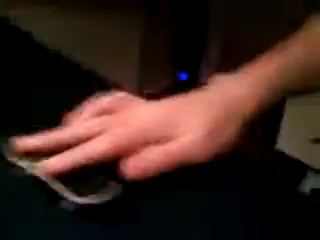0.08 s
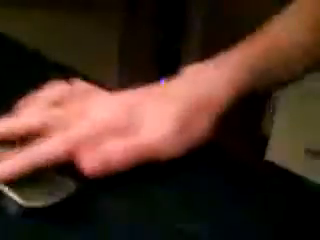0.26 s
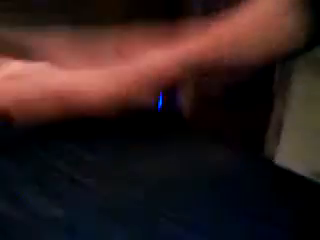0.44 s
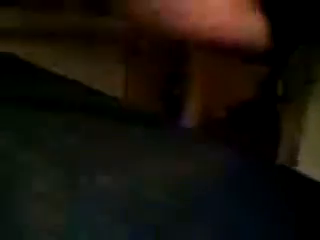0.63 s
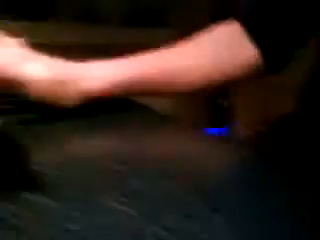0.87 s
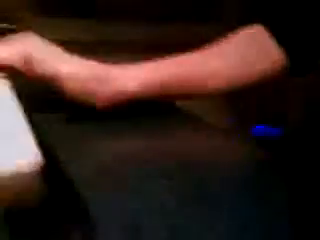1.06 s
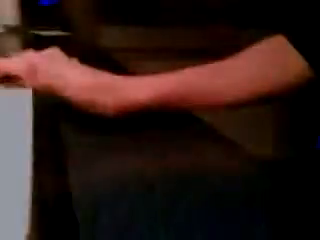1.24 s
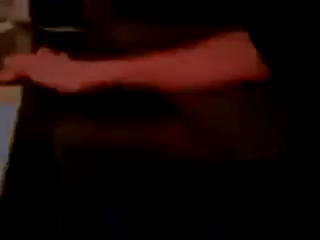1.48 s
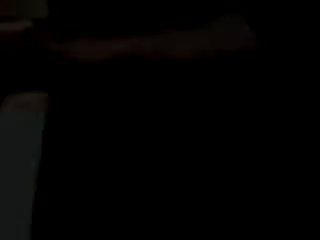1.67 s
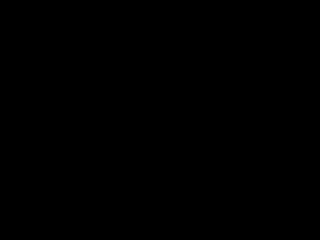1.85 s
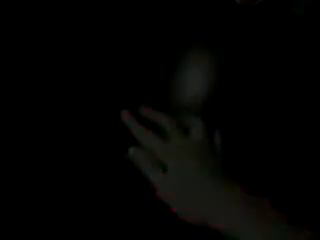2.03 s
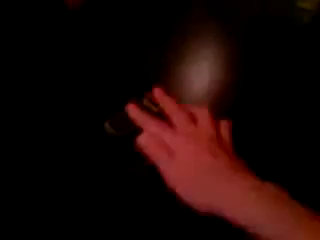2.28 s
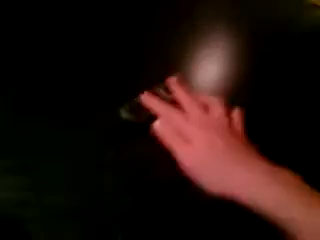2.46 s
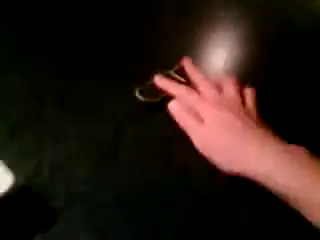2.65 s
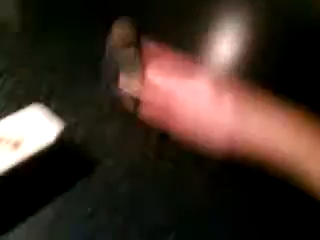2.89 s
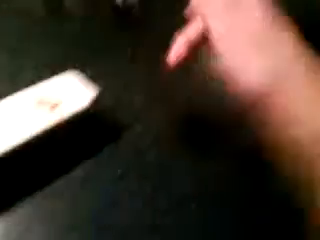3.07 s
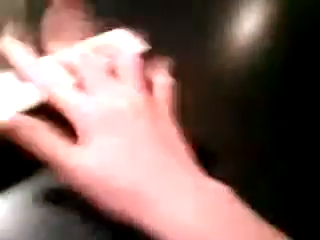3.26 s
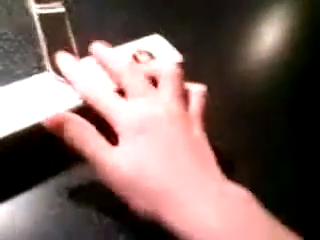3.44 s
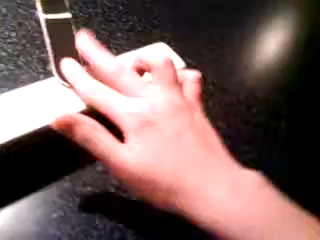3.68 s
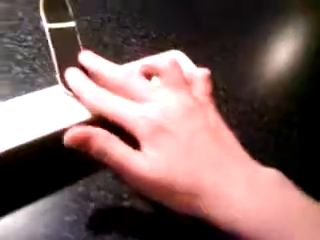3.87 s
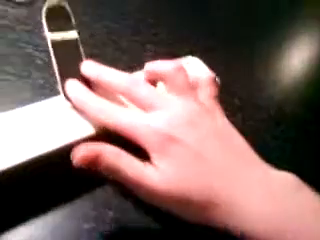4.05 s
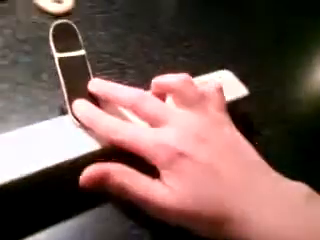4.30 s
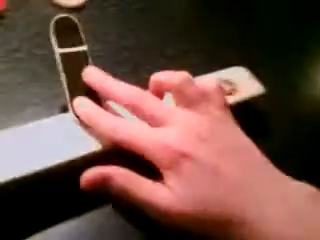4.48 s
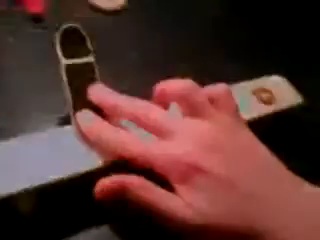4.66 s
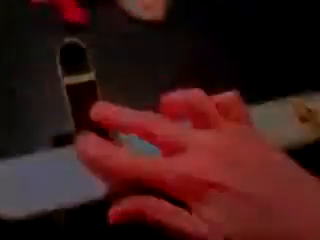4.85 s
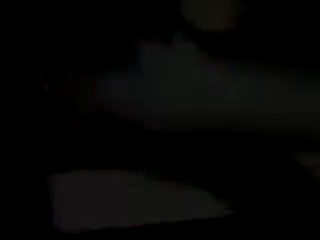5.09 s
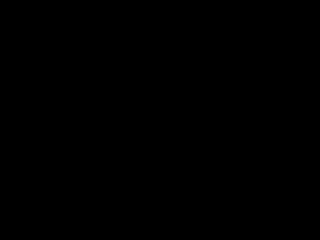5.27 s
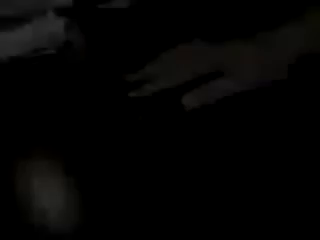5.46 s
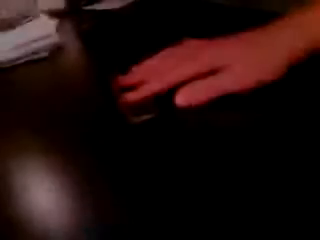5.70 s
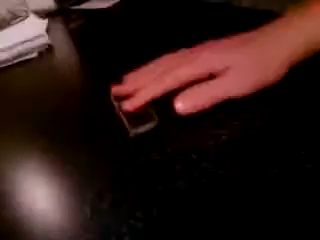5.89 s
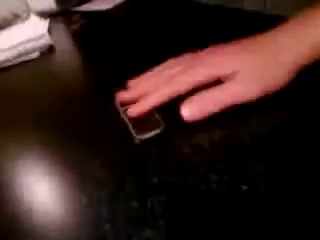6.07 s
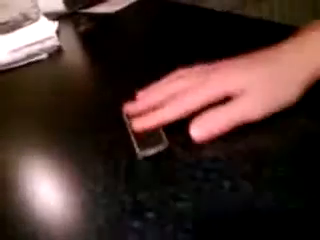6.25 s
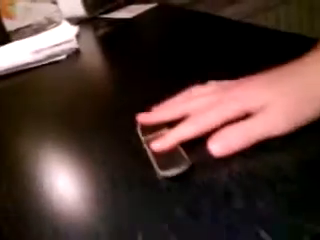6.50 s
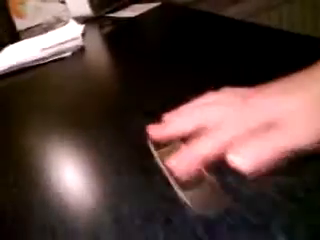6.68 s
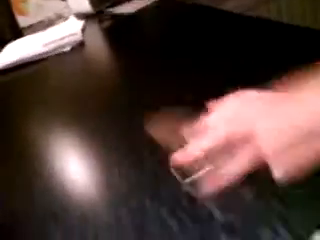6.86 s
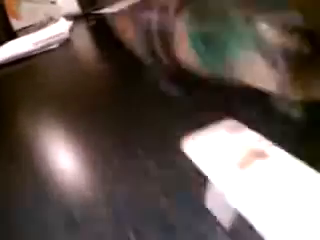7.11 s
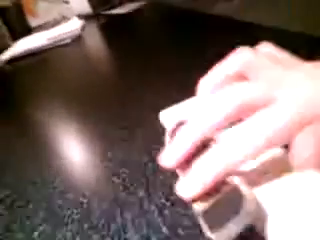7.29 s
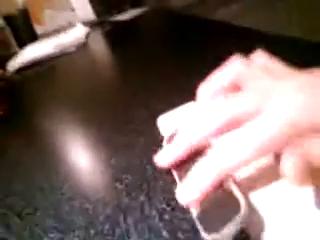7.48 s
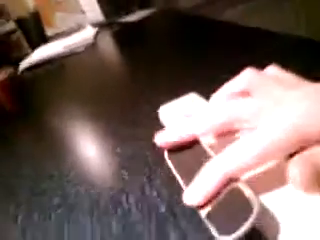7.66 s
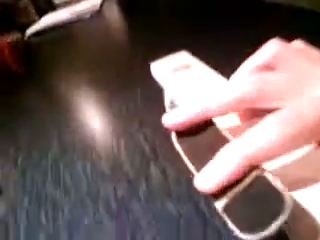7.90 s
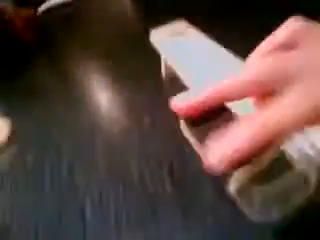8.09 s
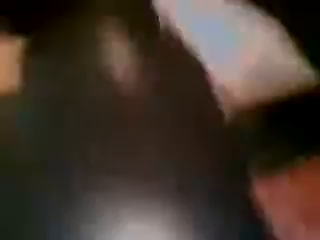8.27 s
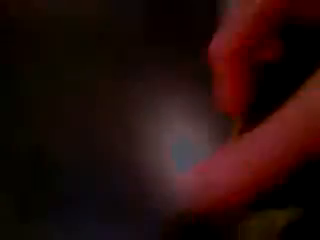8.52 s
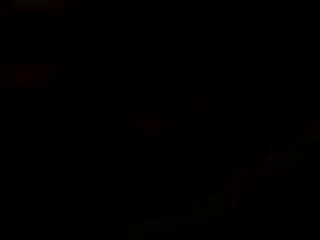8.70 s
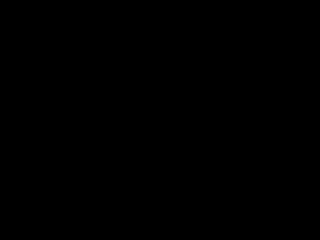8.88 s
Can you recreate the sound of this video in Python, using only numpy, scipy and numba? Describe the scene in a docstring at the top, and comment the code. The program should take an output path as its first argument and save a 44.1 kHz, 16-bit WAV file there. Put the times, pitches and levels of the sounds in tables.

```python
"""Finger-sized skateboard on a table

Four short passages of a tiny board heard close by on a hard table top, made by source-filter synthesis.
Random grit under the wheels excites resonances of deck and axles; blows ring decaying modes; stick-slip
knocks make the deck scrape along a bench. A small room answers with a decaying noise tail, over filtered
hiss, table rumble and faint hum. One short block of sound plays twice and the level dips briefly twice.
"""
import sys
import numpy as np
from scipy import signal
from scipy.fft import rfft, irfft
from scipy.io import wavfile
from scipy.ndimage import uniform_filter1d
from numba import njit

SR = 44100
rng = np.random.default_rng(int(sys.argv[2]) if len(sys.argv) > 2 else 0)


def log_audio(samples):
    """Write samples as a 16-bit WAV file to the path given in sys.argv[1]."""
    # one column per channel
    frames = np.atleast_2d(samples).T
    # limit to full scale, then quantise
    limited = np.clip(frames, -1, 1)
    pcm = np.round(limited * 32767).astype(np.int16)
    wavfile.write(sys.argv[1], SR, pcm)


N = 394254
T = np.arange(N) / SR


def undb(db):
    """Decibels: convert a level to an amplitude ratio."""
    return 10 ** (np.asarray(db) / 20)


def unit(x):
    """Normalisation: scale to rms 1."""
    return x / np.sqrt(np.mean(x ** 2))


def columns(tables):
    """Linear interpolation: control curves of several spans, and a gate that is open inside them."""
    rows = np.vstack(tables)
    gate = np.zeros(N)
    for table in tables:
        start_s, end_s = table[0][0], table[-1][0] + .007
        gate[int(start_s * SR):int(end_s * SR)] = 1
    curves = [np.interp(T, rows[:, 0], column) for column in rows[:, 1:].T]
    return curves + [uniform_filter1d(gate, size=200)]


@njit
def bandpass(x, centre_hz, width_hz):
    """State-variable resonance: a band-pass with a moving centre, gain 1 there."""
    y = np.empty(len(x))
    band, low = 0., 0.  # the two integrator states
    for i in range(len(x)):
        g = np.tan(np.pi * centre_hz[i] / SR)
        damping = width_hz / centre_hz[i]
        v = (band + g * (x[i] - low)) / (1 + g * (g + damping))
        band, low = 2 * v - band, low + 2 * g * v
        y[i] = damping * v
    return y


def ring(x, resonances):
    """Superposition: a sum of fixed resonances with alternating signs, at rms 1."""
    total = np.zeros(N)
    for k, (hz, width_hz, db) in enumerate(resonances):
        total += (-1) ** k * undb(db) * bandpass(x, np.full(N, 1. * hz), 1. * width_hz)
    return unit(total)


def walk(rate):
    """Slow random modulation: levels drawn `rate` times a second and smoothed, spread near 1."""
    hold = int(SR / rate)
    steps = np.repeat(rng.standard_normal(N // hold + 1), hold)
    return np.sqrt(3 / 2) * uniform_filter1d(steps, hold)[:N]


def grit(rate, spread_db, rubbing):
    """Random impulse excitation: tiny knocks of uneven size over a share of smooth rubbing."""
    size = rng.standard_normal(N) * undb(spread_db * rng.exponential(size=N))
    knocks = (rng.random(N) < rate / SR) * size
    return unit(knocks) + rubbing * rng.standard_normal(N)


# Wheels on the table, one curve per roll. Each row: time in seconds, rumble level in dB.
ROLLS = [
    [(0, -27.5), (0.07, -31.5), (0.3, -34), (0.344, -34)],
    [(0.353, -20.5), (0.4, -23.5), (0.43, -21), (0.49, -18), (0.515, -30)],
    [(1.565, -37.5), (1.62, -47.5), (1.73, -38), (1.8, -41), (1.83, -47), (1.9, -51), (2.06, -50.5)],
    [(2.58, -53.5), (2.6, -49), (2.67, -54), (2.76, -62.5), (2.775, -52), (2.81, -54), (2.885, -48)],
    [(2.895, -46.5), (2.915, -26), (2.965, -26.5)],
    [(5.21, -51), (5.28, -57), (5.36, -60), (5.45, -67)],
    [(5.97, -62), (6.02, -47.5), (6.2, -47.5), (6.26, -42.5), (6.45, -40), (6.52, -35), (6.6, -34.5),
     (6.67, -31), (6.8, -28.5)],
    [(6.81, -25), (6.88, -17), (6.92, -23), (6.94, -31)],
    [(8.345, -48.5), (8.365, -35.5), (8.405, -34.5), (8.435, -47.5)],
    [(8.53, -51.5), (8.64, -37), (8.72, -37.5), (8.755, -34), (8.8, -36.5), (8.84, -33), (8.94, -39)],
]
# Colour of each roll at the reference level. Each row: rumble pitch in Hz, then deck ring, axle ring and
# treble grit in dB over the rumble.
ROLL_COLOUR = [(975, -2, -2, 1.5), (990, -3.5, -8.5, -8.5), (1140, -5, -3, -16), (1400, 2, 1, -4),
               (1010, -3, -7.5, -8), (1430, -4.5, -2.5, -11), (920, -7.5, -13, -9), (1080, -5.5, -8.5, -6),
               (1340, 1, -1.5, 0), (1310, -7.5, -7, -14)]
# Resonances of the deck. Each row: centre in Hz, width in Hz, relative level in dB.
DECK_RING = [(470, 40, 1.5), (563, 270, -3), (697, 190, -2.5), (1231, 89, -1), (1470, 30, -2.5),
             (1795, 250, 3.5), (2180, 300, -1)]
# Resonances of the axles. Each row: centre in Hz, width in Hz, relative level in dB.
AXLE_RING = [(3510, 86, -4), (4120, 730, 2), (4556, 500, 1)]
REFERENCE_DB = -35
PITCH_HZ_PER_DB, AXLE_DB_PER_DB, TREBLE_DB_PER_DB = 7.5, 0.1, -0.1035  # harder rolling is higher and duller
DRIFT_DB, DRIFT_PER_S, FLICKER_DB, FLICKER_PER_S = 2, 14, 3.5, 28  # of axle ring, of treble


def wheels():
    """Forced vibration: the table grain shakes deck and axles, and each band's level wanders."""
    rolls = [[row + colour for row in roll] for roll, colour in zip(ROLLS, ROLL_COLOUR)]
    db, hz, deck_db, axle_db, treble_db, gate = columns(rolls)
    effort = db - REFERENCE_DB
    axle_db = axle_db + AXLE_DB_PER_DB * effort + DRIFT_DB * walk(DRIFT_PER_S)
    treble_db = treble_db + TREBLE_DB_PER_DB * effort + FLICKER_DB * walk(FLICKER_PER_S)
    grain, fine = grit(3500, 1.9, .7), grit(3500, 2., .6)
    body_wobble, axle_wobble, treble_wobble = [undb(1.8 * walk(rate)) for rate in (60, 70, 30)]
    rumble = unit(bandpass(grain, hz + PITCH_HZ_PER_DB * effort, 240.0))
    body = (rumble + undb(deck_db) * ring(grain, DECK_RING)) * body_wobble
    axles = undb(axle_db) * ring(grain, AXLE_RING) * axle_wobble
    treble = undb(treble_db) * ring(fine, [(6530, 1400, -4.0), (3120, 970, -8)]) * treble_wobble
    return gate * undb(db) * (body + axles + treble)


# Blows of the board. Each row: start in seconds, dry peak in dB, colour below 1 kHz, near 2 kHz and near
# 6 kHz in dB over that near 4 kHz, time scale of the noise burst in ms.
HITS = [(0.518, -7.5, -18, -5, 4, 3.6), (0.778, -19, -24, -26, -1, 0.83), (0.951, -15.5, -40, 16, 21, 10.6),
        (0.959, -4, -43, -8, -10, 3), (0.964, -1.5, -38, -16.5, -14, 3.4), (0.999, -9, -34, -7, -6.5, 15),
        (1.035, -10.5, -25, 2.5, -3, 8.9), (1.262, -22, -18, 6, -8, 2.8), (1.376, -27, -1.5, 6, 6.5, 4.6),
        (1.418, -26.5, -17.5, -8, -8, 4.9), (1.494, -14.5, -27, -1.5, 1.5, 0.79),
        (1.526, -10.5, -19.5, -5, 1, 2.1), (1.535, -10.5, -9.5, 10.5, -2.5, 7),
        (2.767, -32.5, -15, 2, 1, 7.4), (2.973, 1.5, -13, -15.5, -0.5, 0.81),
        (2.999, -16.5, 3.5, -17, 5, 4.3), (3.244, -26, -14.5, -5, -5, 6), (3.253, -4, -10, -13.5, -3, 1.5),
        (3.28, -7, -37, -5.5, -5, 6.1), (3.293, -5, -22, 1, -2, 2.9), (3.325, -7, -26, -1, 2.5, 1.5),
        (3.376, -13, -17, 12, 2, 5.8), (3.5, -20, -29, -2, 10, 1.6), (3.546, -21.5, -32, -15, 8, 3.2),
        (5.176, -20, -16.5, -26, -7.5, 3), (5.191, -21, -18, -6, -2, 2.8), (6.942, -6.5, -26, -2.5, 2, 1.7),
        (6.96, -5.5, -10, -13, 5, 5.2), (7.271, -5.5, -7, 7.5, 14.5, 2.56), (7.299, -11, -11, 5.5, 0, 2.2),
        (7.305, -6, -18.5, 3.5, -2, 5.6), (7.602, -29.5, -38.5, 0.5, 3, 1.8),
        (8.25, -21, -22.5, -8, -8, 0.68), (8.441, -14.5, -23, -1, 11, 3.5),
        (8.454, -8.5, -23, -14.5, -4, 5.3), (8.461, -11.5, -12, -8, -0.5, 3.9)]
# Modes of deck, axles and bench. Each row: mean frequency in Hz, mean relative level in dB, t60 in seconds.
BOARD_MODES = [(445.4, 0, 0.049), (910, -6.5, 0.11), (1395, -3, 0.05), (1670, -9, 0.03), (1980, -2, 0.019),
               (2376, -0.5, 0.024), (2813, -11.5, 0.03), (3440, -4, 0.019), (4164, -2.5, 0.021),
               (5800, -5.5, 0.0031)]


def hits():
    """Modal excitation: a short noise burst cracks and rings every mode; where a blow falls sets the colour."""
    early = 96  # samples kept ahead of the blow for the colour filter's pre-ringing
    out, t = np.zeros(N + 8192), np.arange(4096) / SR
    hz, db, t60 = np.transpose(BOARD_MODES)
    f = np.arange(2049) * SR / 4096 + 1  # offset keeps the logarithm finite
    corners_hz = [150, 600, 1800, 3800, 6300, 8000]
    for s, peak_db, low_db, mid_db, top_db, ms in HITS:
        # every blow scatters mode levels by 3 dB and frequencies by 1.2 %
        level_chance, pitch_chance = rng.standard_normal((2, len(BOARD_MODES))) * [[3], [.012]]
        decay = np.exp(-np.log(1000) * np.outer(t, 1 / t60))
        modes = np.sin(2 * np.pi * np.outer(t, hz * (1 + pitch_chance))) * decay
        body = modes @ undb(db + level_chance - 31)
        body[0] = 1  # passes the bare crack of the burst
        # each blow is a noise burst with a short soft rise, then a weaker decaying tail
        rise = t * 1000 / max(ms, .1)
        envelope = rise * np.exp(-2.4 * rise) + undb(-24) * np.exp(-t / .014)
        burst = rng.standard_normal(len(t)) * envelope
        corners_db = [low_db - 31.0, low_db, mid_db, 0, top_db, top_db - 17]
        colour_db = np.interp(np.log(f), np.log(corners_hz), corners_db)
        blow = np.roll(irfft(rfft(body) * rfft(burst) * undb(colour_db)), early)
        first = int(s * SR)
        out[first:first + len(blow)] += undb(peak_db) * blow / np.abs(blow).max()
    return out[early:N + early]


def stick_slip(tables, resonances, chatter_db, rate):
    """Stick-slip friction: knocks that come in quick bunches excite resonances."""
    db, gate = columns(tables)
    slip = grit(3000, 2.1, .7) * undb(chatter_db * walk(rate))
    return gate * undb(db) * ring(slip, resonances)


# Deck scraping on the bench, one curve per grind. Each row: time in seconds, level in dB.
GRINDS = [
    [(1.05, -32), (1.15, -40), (1.25, -47), (1.37, -45), (1.4, -36.5), (1.46, -37.5), (1.49, -54)],
    [(3.26, -26), (3.33, -25.5), (3.4, -33.5), (3.55, -38), (3.63, -40.5), (3.7, -58), (3.78, -51),
     (3.82, -47.5), (3.95, -53.5)],
    [(5.14, -51), (5.2, -48)],
]
# Resonances of the grinds. Each row: centre in Hz, width in Hz, relative level in dB.
GRIND_RING = [(1650, 254, 0.5), (2410, 240, 0), (3040, 690, -3), (4050, 720, 1.5), (6100, 6700, -8)]


def grinds():
    """Stick-slip friction: the deck grinds on the bench."""
    return stick_slip(GRINDS, GRIND_RING, 2.2, 70)


# The long slide of the deck on the bench. Each row: time in seconds, level in dB.
SLIDE = [
    [(7.69, -48.5), (7.79, -38), (8.05, -37), (8.3, -39), (8.345, -40)],
]
# Resonances of the slide. Each row: centre in Hz, width in Hz, relative level in dB.
SLIDE_RING = [(1780, 2000, 7.1), (3080, 110, 21.2), (4100, 170, 4.6), (5800, 230, 2), (5300, 6700, 6.3)]


def slide():
    """Stick-slip friction: the deck slides with a narrow, dominant resonance near 3 kHz."""
    return stick_slip(SLIDE, SLIDE_RING, 2.2, 70)


# The bench knocking against the table while the deck slides. Each row: time in seconds, level in dB.
BENCH = [
    [(7.74, -55), (7.8, -48), (8.3, -49), (8.39, -45), (8.45, -56)],
]
# Resonances of the bench. Each row: centre in Hz, width in Hz, relative level in dB.
BENCH_RING = [(132, 28, -0.5), (348, 36, -4.5)]


def bench_knocks():
    """Low-frequency resonance: bunched knocks of the bench on the table, slower and more uneven."""
    return stick_slip(BENCH, BENCH_RING, 4, 22)


ROOM_T60_S, ROOM_DB = 0.32, -10.5


def room(x):
    """Reverberation: convolution with dense, exponentially decaying echoes that build up over 10 ms."""
    t = np.arange(int(.6 * SR)) / SR
    decay = np.exp(-np.log(1000) * t / ROOM_T60_S)
    tail = rng.standard_normal(len(t)) * decay * np.minimum(t / .01, 1)
    tail /= np.sqrt(np.sum(tail ** 2))  # unit energy
    return undb(ROOM_DB) * signal.fftconvolve(x, tail)[:N]


# Edges of the four passages. Each entry: time in seconds.
CUTS_S = [0, 2.062, 5.453, 8.56, 9]
# Background of each passage. Each row: fade-in start in seconds, its length in seconds, time at which the
# fade-out line reaches zero in seconds, hiss in dB at start and at end, idle table in dB.
PASSAGES = [(-1, 1.3, 2.44, -51.5, -48.5, -66), (2, 1.53, 5.65, -49, -55, -61),
            (5.5, 0.8, 10, -53.5, -51, -60.5), (5.44, .9, 11, -49.5, -57, -76)]
FADE_OUT_S = 1.0


def passages():
    """Piecewise envelopes: fade gain, hiss gain and idle table gain, passage by passage."""
    fade, hiss, idle = np.zeros((3, N))
    for start, end, row in zip(CUTS_S, CUTS_S[1:], PASSAGES):
        fade_in, rise_s, silent, first_db, last_db, idle_db = row
        now = (T >= start) & (T < end)
        rise = (T[now] - fade_in) / rise_s
        fall = (silent - T[now]) / FADE_OUT_S
        fade[now] = np.clip(np.minimum(rise, fall), .03, 1)
        hiss[now] = undb(np.interp(T[now], [start, end], [first_db, last_db]))
        idle[now] = undb(idle_db)
    return fade, hiss, idle


# Hand or board pressing on the table top. Each row: start in seconds, end in seconds, dB at start, dB at end.
PRESSES = [(0, 0.546, -43.5, -51.5), (0.817, 1.074, -37.5, -54), (1.09, 1.562, -55.5, -53.5),
           (2.608, 2.99, -50.5, -55.5), (3.238, 4.901, -50.5, -62.5), (6.1, 6.977, -50.5, -55),
           (7.6, 8.5, -56.5, -56)]
# Resonances of the table. Each row: centre in Hz, width in Hz, relative level in dB.
TABLE_RING = [(91, 20, 1), (157, 22, 0.5), (193, 27, -1), (327, 130, -2.5)]


def table_rumble(idle):
    """Plate resonance: noise shakes the table, more while something presses on it."""
    spans = [[(start, first_db), (end, last_db)] for start, end, first_db, last_db in PRESSES]
    press_db, gate = columns(spans)
    shake = np.maximum(uniform_filter1d(gate, size=2000) * undb(press_db), idle)
    return ring(rng.standard_normal(N), TABLE_RING) * shake * undb(0.97 * walk(35))


# Spectrum of the hiss. Each row: frequency in Hz, relative density in dB per Hz.
HISS_COLOUR = [(30, 9.5), (150, -31.5), (350, -2.5), (800, -1.5), (1200, -1.5), (3300, -4), (7500, -12.5)]


def hiss(gain):
    """Coloured noise: random noise shaped in the frequency domain, its level drifting slightly."""
    hz, db = np.transpose(HISS_COLOUR)
    f = np.arange(N // 2 + 1) * SR / N + 1
    shape = undb(np.interp(np.log(f), np.log(hz), db)) * (f < 1.1 * TOP_HZ)
    noise = unit(irfft(rfft(rng.standard_normal(N)) * shape, N))
    return noise * gain * undb(.8 * walk(12))


# Partials of the hum. Each row: frequency in Hz, level before its fade in dB rms.
HUM = [(100, -65), (199.5, -55)]
# Fade of the hum. Each row: time in seconds, gain in dB.
HUM_FADE = [(.85, -2.5), (1.1, -6.5), (1.9, -32)]


def hum():
    """Steady sine tones: mains hum that sinks over the first two seconds."""
    tones = sum(undb(db) * np.sqrt(2) * np.sin(2 * np.pi * hz * T) for hz, db in HUM)
    return tones * undb(np.interp(T, *np.transpose(HUM_FADE)))


def background():
    """Superposition: hiss and table rumble under the fades, with the hum outside them."""
    fade, hiss_gain, idle = passages()
    return fade * (hiss(hiss_gain) + table_rumble(idle)) + hum()


def scene():
    """Superposition: board sounds in the room, echoes cut where a passage ends, over the background."""
    board = wheels() + hits() + grinds() + slide() + bench_knocks()
    total = background()
    for start, end in zip(CUTS_S, CUTS_S[1:]):
        passage = (T >= start) & (T < end)
        total += passage * (board + room(passage * board))
    return total[None]


# Brief dips in level. Each row: centre in seconds, half width in seconds, gain at the centre in dB.
DIPS = [(1.932, 0.037, -41), (5.323, 0.039, -44)]
TWICE_S, BLOCK = .941, 5645  # start of the block that is heard twice, its length in samples
LIMIT, LOW_HZ, TOP_HZ = 1, 41.2, 7000  # peak ceiling, bass and treble cutoffs


def record(dry):
    """Saturation and filtering: peaks are rounded, bass is cut, a block repeats, the level dips, and top is cut."""
    rounded = LIMIT * np.tanh(dry / LIMIT)
    bass_cut = signal.butter(2, LOW_HZ, "high", fs=SR, output="sos")
    top_cut = signal.cheby1(14, .3, TOP_HZ, fs=SR, output="sos")
    start = int(TWICE_S * SR)
    index = np.arange(N)
    index[start - BLOCK:start] += BLOCK  # the block also replaces the sound just before it
    dip_db = sum(db * np.maximum(1 - np.abs(T - s) / half, 0) ** 1.7 for s, half, db in DIPS)
    edited = signal.sosfilt(bass_cut, rounded)[:, index] * undb(dip_db)
    return signal.sosfilt(top_cut, edited)


dry = scene()
out = record(dry)
log_audio(out)
```